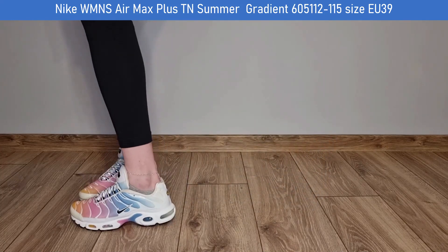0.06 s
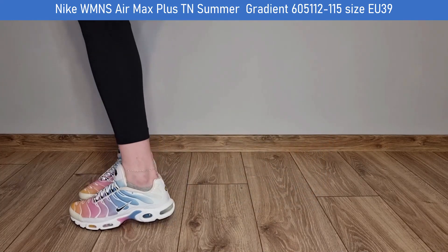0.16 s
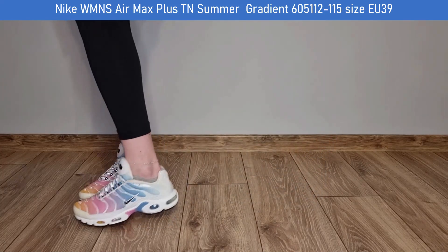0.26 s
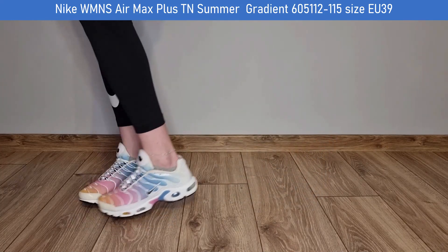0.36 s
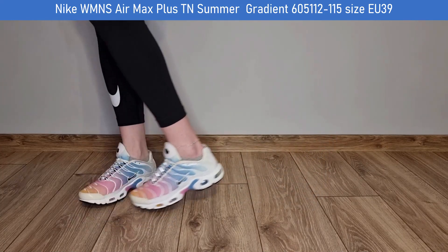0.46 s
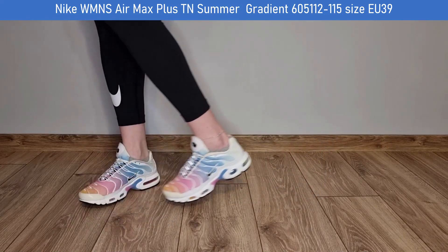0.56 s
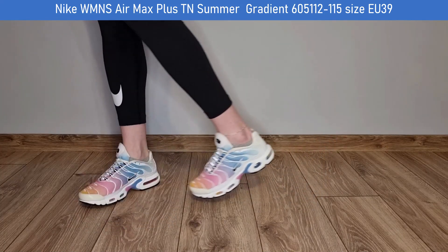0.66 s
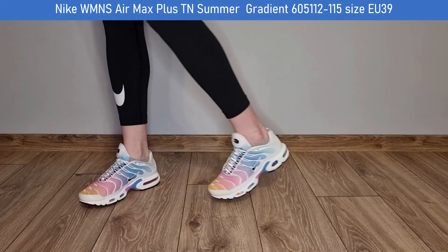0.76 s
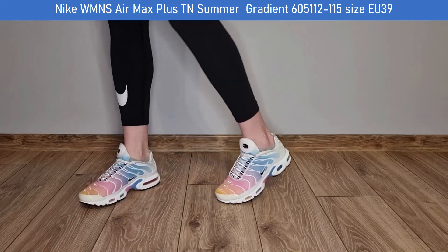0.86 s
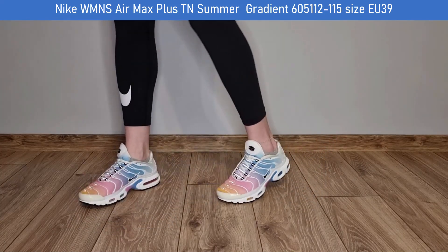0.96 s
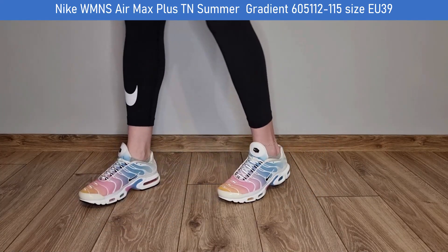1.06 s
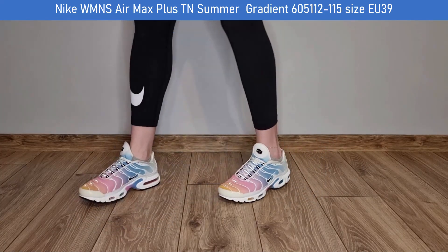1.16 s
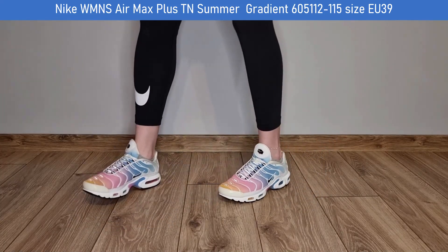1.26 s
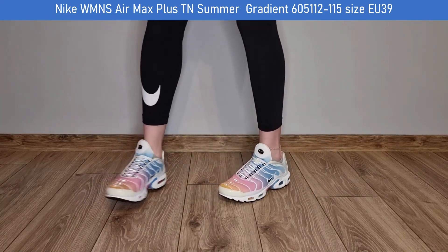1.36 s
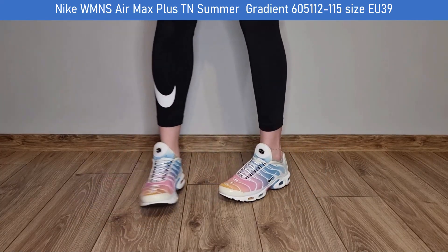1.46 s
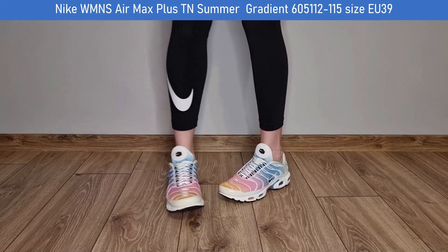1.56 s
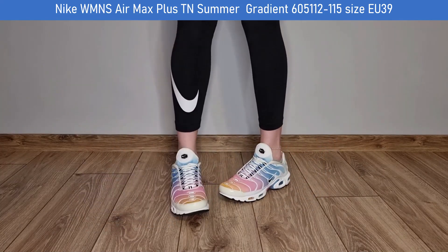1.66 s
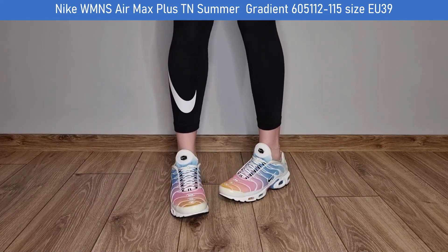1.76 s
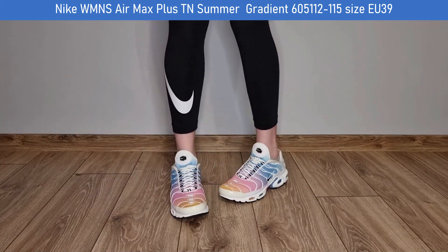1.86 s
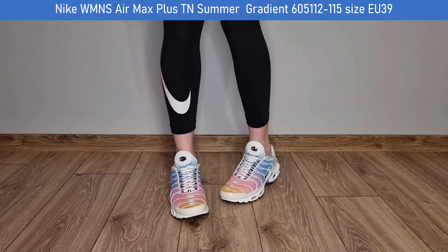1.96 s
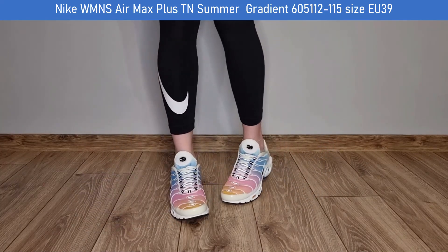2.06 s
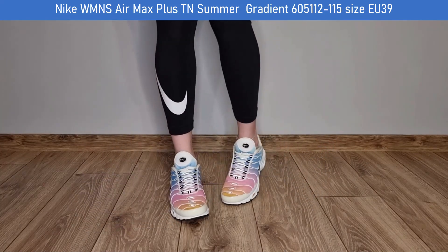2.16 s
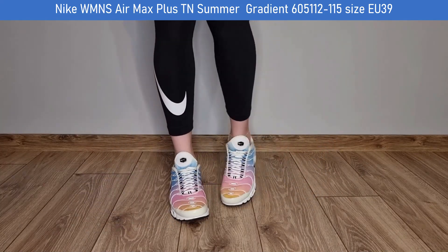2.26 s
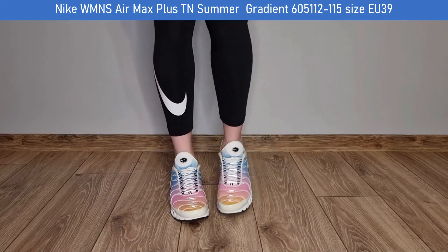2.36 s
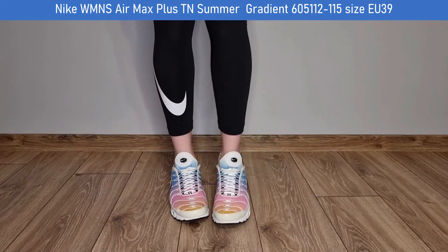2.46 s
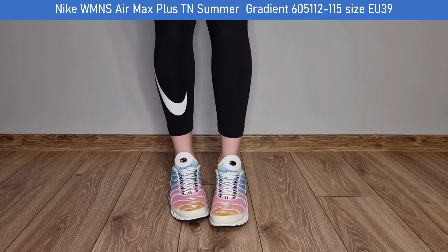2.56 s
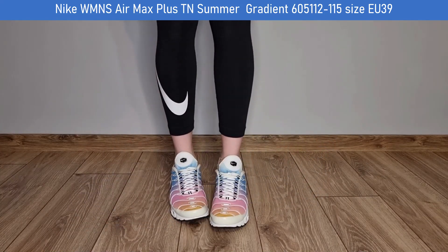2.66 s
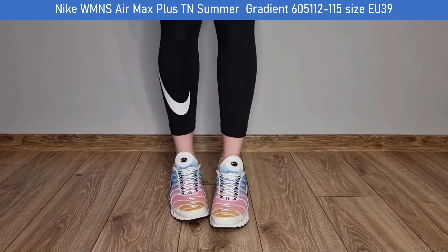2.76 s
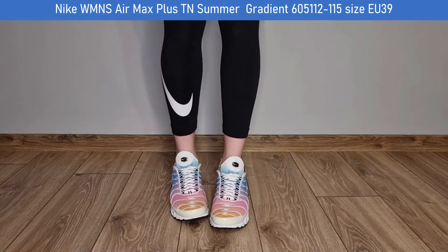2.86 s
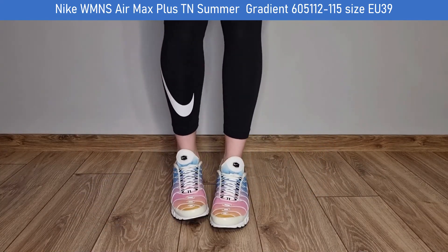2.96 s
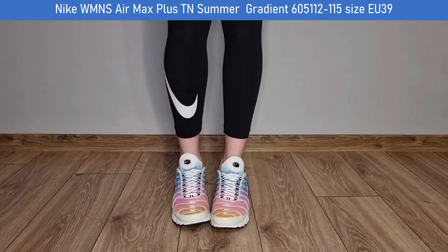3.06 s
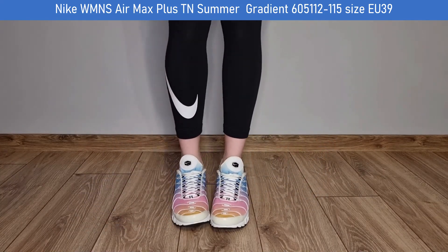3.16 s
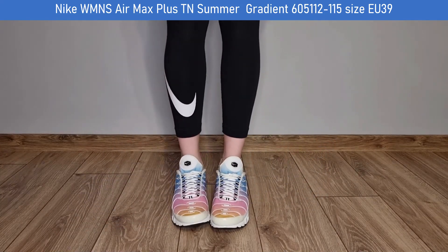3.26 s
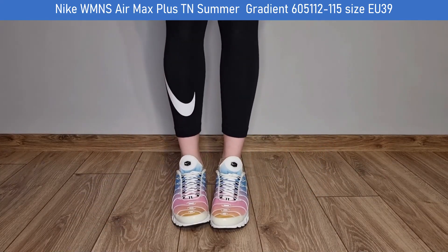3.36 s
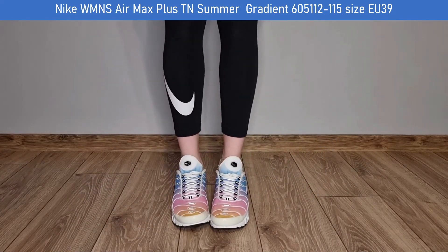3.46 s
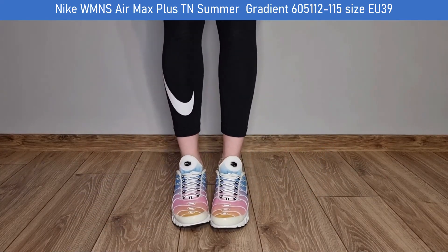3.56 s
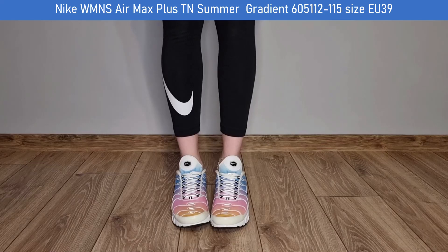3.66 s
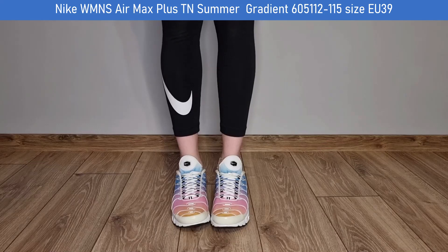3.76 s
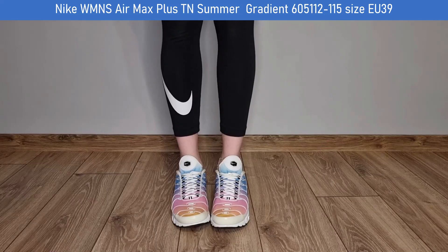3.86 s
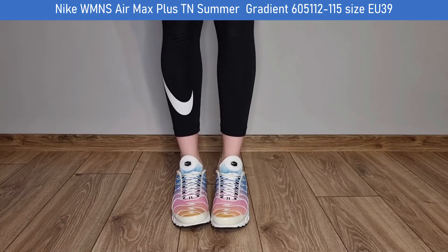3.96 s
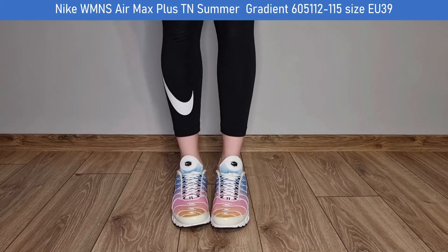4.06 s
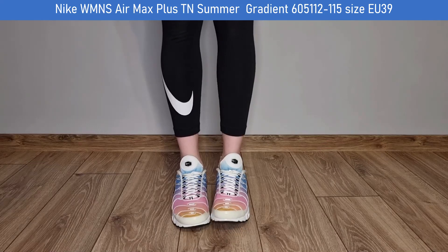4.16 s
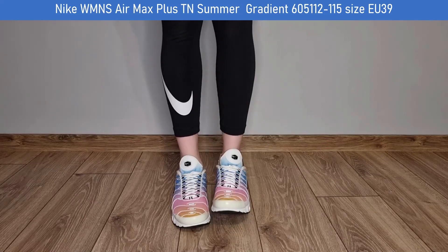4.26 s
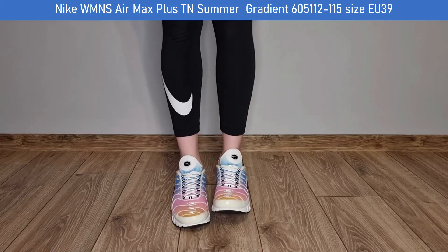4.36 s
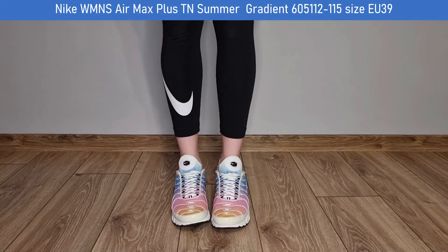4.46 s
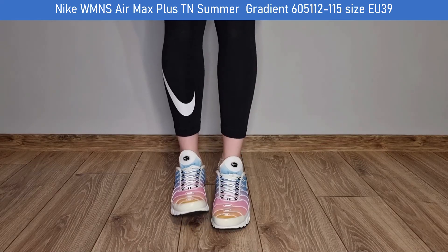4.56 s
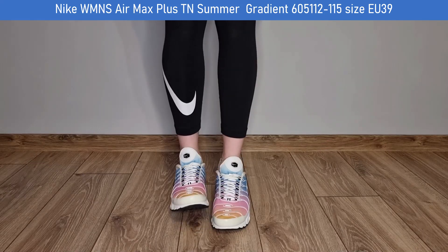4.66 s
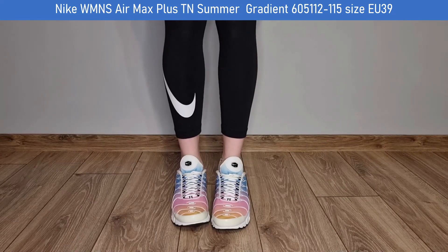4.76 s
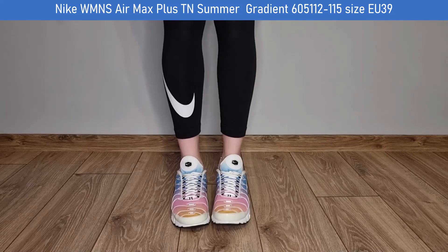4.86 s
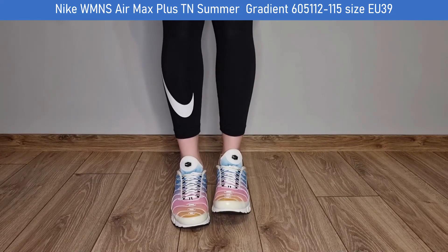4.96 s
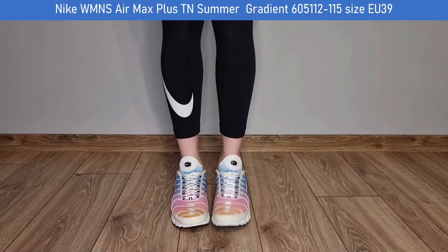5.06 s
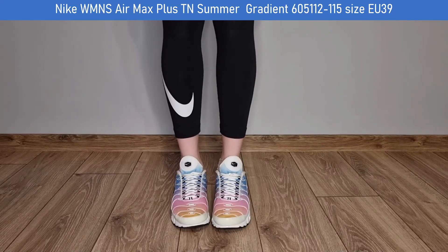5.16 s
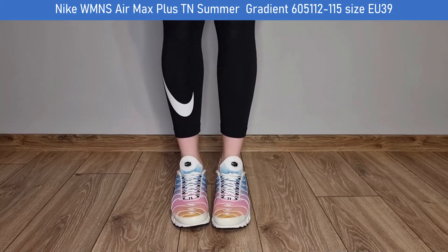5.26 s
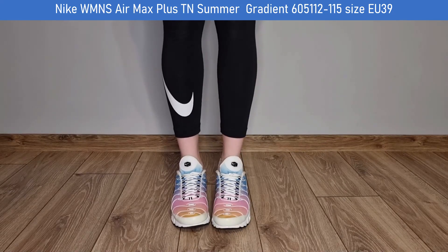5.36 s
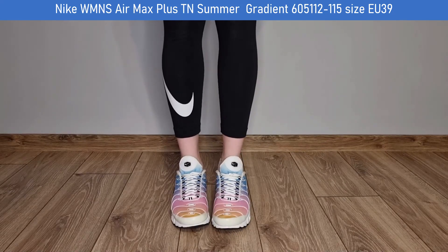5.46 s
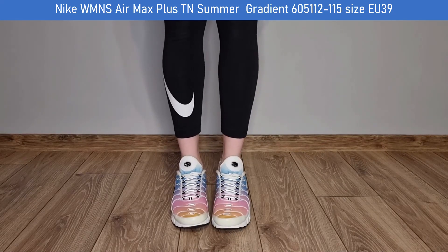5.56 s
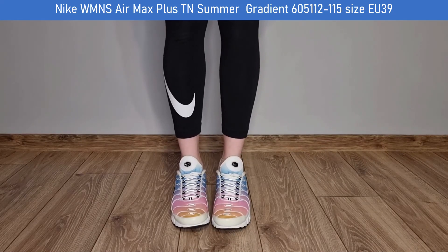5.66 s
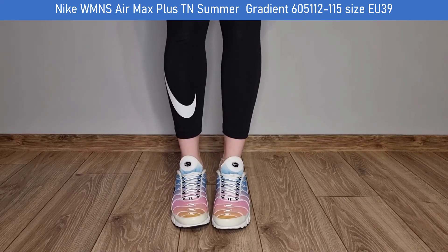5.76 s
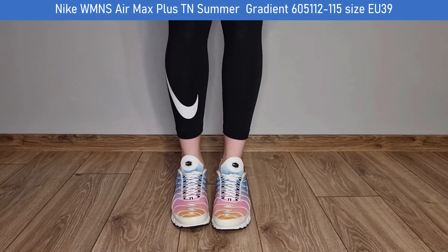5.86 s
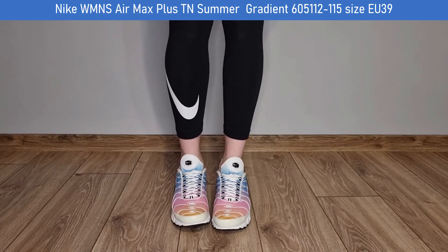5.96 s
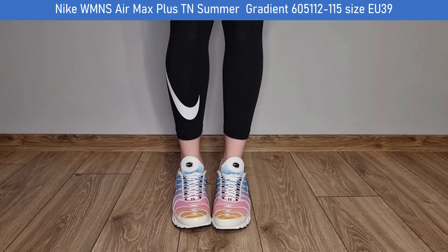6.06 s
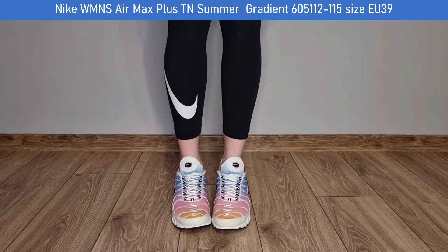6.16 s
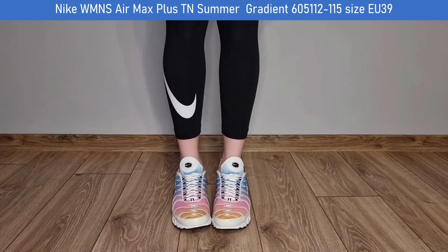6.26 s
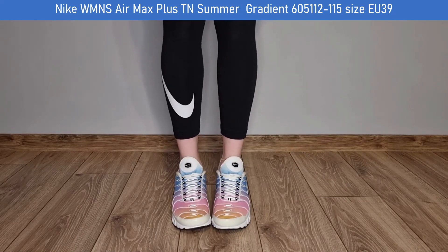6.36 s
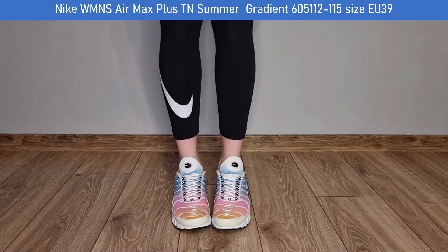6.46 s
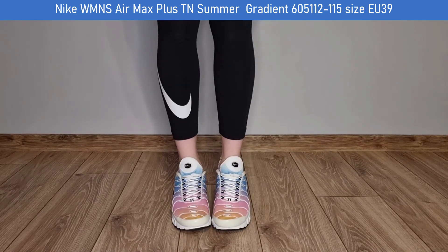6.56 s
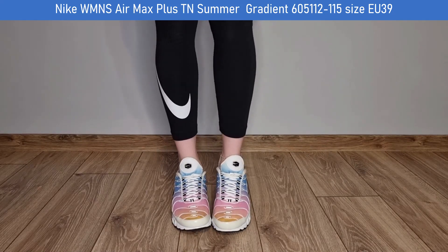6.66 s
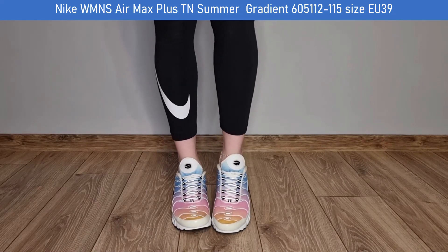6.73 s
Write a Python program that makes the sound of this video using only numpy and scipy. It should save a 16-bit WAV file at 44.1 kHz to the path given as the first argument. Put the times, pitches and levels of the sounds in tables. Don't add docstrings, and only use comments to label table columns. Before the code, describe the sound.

Rubber-soled sneakers scuff, shuffle and tap on a laminate floor in a small bare room, over a faint steady fan hum.

```python
import sys
import numpy as np
from scipy import signal
from scipy.fft import rfft, irfft, next_fast_len
from scipy.io import wavfile
from scipy.ndimage import uniform_filter1d, map_coordinates

SR = 44100
rng = np.random.default_rng(int(sys.argv[2]) if len(sys.argv) > 2 else 0)


def bounce(signal):
    frames = np.transpose(np.atleast_2d(signal))
    limited = np.clip(frames, -1, 1)
    pcm = np.round(limited * 32767).astype(np.int16)
    wavfile.write(sys.argv[1], SR, pcm)


def amplitude_ratio(level_db):
    exponent = np.asarray(level_db, float) / 20
    return 10 ** exponent


N = 299703

# pitch_hz, level_db, left_lag_rad
WHINE = (7982, -86, 2.2)
# frequency_hz, density_db
HISS = [(1500, 6), (3000, 2.5), (4300, -0.5), (6300, 2), (7200, -8), (7600, -3.5), (8300, -23),
        (9000, -12.5), (9600, -5), (10300, -16), (11700, -2.5), (12000, -2), (12300, -21.5), (15500, -14)]
HISS_DB = -86

# frequency_hz, density_db
AIRFLOW = [(15, -12.5), (60, -9), (120, -10), (185, 4), (270, -8), (380, 3.5), (460, -3.5), (560, -1.5),
           (670, -8), (760, -6.5), (900, -12.5), (1200, -11), (1950, -20.5), (2200, -40.5)]
AIRFLOW_DB = -68.5
# shaft_multiple, left_db, right_db
FAN_LINES = [(9, -72, -69.5), (18, -67, -57.5), (24, -87, -90), (28, -94, -98), (35, -91, -92),
             (48, -101.5, -104.5), (52, -102.5, -111.5), (54, -99, -103), (56, -103.5, -97.5),
             (60, -99, -97.5), (68.6, -108, -99), (79.55, -99, -92.5), (82.5, -100, -99), (92.4, -99, -94)]
SHAFT_HZ = 21.497
# frequency_hz, correlation
NOISE_ALIKE = [(25, -0.13), (170, 0.81), (270, 0.2), (380, 0.65), (500, -0.2), (900, -0.65), (1500, -0.62),
               (2000, -0.1), (8000, 0.006)]

# frequency_hz, density_db
CLOTH = [(1500, -23), (2200, 0), (3000, -1.5), (4200, -4), (5000, -3), (6300, 2.5), (7200, -2.5),
         (8000, -16), (10300, -15), (12000, -13.5)]
# start_s, hold_s, level_db
BRUSHES = [(0.0, 0.011, -76), (.145, 0.055, -74), (1.2, 0.23, -82), (1.6, 0.13, -82), (1.94, 0.053, -76),
           (2.05, 0.31, -82), (2.87, 0.022, -80.5), (2.99, 0.52, -87.5), (3.6, 0.24, -90.5),
           (4.0, 0.29, -91), (4.6, 0.051, -77), (4.92, 0.035, -78), (5.05, .13, -95), (6.47, 0.31, -78)]
BRUSH_RISE, BRUSH_FALL = 390, 290
# start_s, hold_s, level_db
FIZZ = [(.125, .01, -88.5), (.29, .015, -89), (.885, .01, -93), (1.2, 0.025, -99), (1.3, 0.018, -88),
        (1.55, .01, -95), (1.66, .01, -100), (1.94, .01, -97), (2.09, .29, -95), (2.64, 0.013, -81),
        (2.87, .02, -105), (2.99, .03, -99), (3.4, .015, -94), (4.25, .015, -99), (4.5, 0.17, -90.5),
        (4.79, 0.099, -99), (5.06, .02, -99), (6.42, .03, -88), (6.48, 0.046, -85), (6.59, 0.046, -87),
        (6.71, .04, -91), (6.78, .02, -90)]
FIZZ_RISE, FIZZ_FALL = 500, 550
# start_s, hold_s, level_db
RUBS = [(1.95, 0.45, -102), (2.8, .26, -94), (6.33, 0.054, -99), (6.49, 0.22, -88.5)]
RUB_RISE, RUB_FALL = 140, 170

# crest_s, peak_db, pitch_hz
PUSHES = [(2, -66, 160), (1.595, -48, 153), (1.658, -50, 167), (1.812, -53, 137), (2.6828, -39, 99),
          (2.371, -65.5, 53), (.8893, -39, 503), (1.5895, -52.5, 500), (1.6555, -53.5, 720),
          (.9075, -31.5, 170), (3.2125, -43, 57)]

# start_s, peak_db, lean_db_per_octave (to higher modes), middle_focus_db
THUDS = [(0.888, -45.5, 6, -4.5), (0.898, -65, 14, -22.5), (0.937, -52.5, 8, 3), (1.236, -47, -9, 22),
         (1.258, -63.5, 11.5, 0.5), (1.31, -89, -5, 0), (1.592, -46.5, 3.5, 16), (1.65, -61, 3, -5),
         (1.81, -66.5, 8.5, -1), (2.368, -80, 11, 3), (2.618, -48, 1.5, 2), (2.673, -82, -3, -9),
         (3.177, -40.5, 3.5, 5), (3.189, -45, 5, -5.5), (3.211, -43, 15.5, 5.5), (3.783, -63, 10, 9),
         (3.819, -61, 6, 15), (4.207, -66, 8, -5), (4.506, -46, -8, 3), (4.518, -31, 5, 2),
         (4.826, -30.5, 6.5, 5), (5.145, -52.5, 17.5, 1), (5.155, -34.5, 5.5, 1), (6.107, -46, 4, -3)]
THUD_HZ = 85
# pitch_hz, level_db, t60_s, buildup_s, polarity
MODES = [(37.7, 6, 0.32, 0.02, 1), (45.3, -0.5, 0.37, 0.025, -1), (55.4, -1, .4, 0.044, -1),
         (64.6, 6.5, 0.32, 0.078, 1), (73.7, -8, 0.28, 0.04, 1), (89.9, 5.5, 0.18, 0.0091, 1),
         (106.7, -1.5, 0.28, 0.022, 1), (120.3, 0.5, 0.35, 0.037, 1), (144.6, -10.5, .26, 0.0051, 1),
         (152.1, 1.5, 0.31, 0.012, 1), (166.6, -5, 0.12, 0.024, 1), (189.7, -9, 0.32, 0.027, 1),
         (226, -24, 0.51, .0038, 1), (131, -4.5, 0.05, 0.0035, 1)]
# start_s, lowest_room_db, deep_room_db, board_db, upper_db
SETTLES = [(.888, -3, 6.5, -2, 1.5), (.937, -8, -6, 0, -2), (1.235, 0, -2, -4, 0), (1.259, 2, 3, -5, -2),
           (1.593, 5, 2.5, -2.5, -9), (1.65, 7, -1, 11, 2.5), (2.617, -1, 4.5, 6.5, 0),
           (3.177, 4, 6.5, -0.5, -6), (3.189, 8, 8, 4, 1), (3.212, 7, 4, 8.5, -8), (3.782, 2, -3, 3, -1.5),
           (4.208, -8, -5.5, 5, -7), (4.506, 1, -5, -8, 5), (4.518, 5, 0.5, -7.5, -3.5),
           (4.827, 0, 8, -11, 2), (5.145, -1, 8.5, -4, -1), (5.156, -1, 8, -1, 0.5),
           (6.105, -1, 14, 4, -5.5)]
# centre_hz, width_octaves
MODE_GROUPS = [(41, 0.2), (68, 0.28), (91.6, 0.18), (150, 0.2)]
# frequency_hz, left_lead_rad
MODE_LEAD = [(41, 0.5), (60, 0.82), (90, 0.07), (150, 0.38)]
# frequency_hz, left_over_right_db
MODE_PAN = [(41, -1.5), (65, -1), (90, -2.2), (150, -0.8)]

# start_s, sole_db, dullness_db_per_octave, board_knock_db, tread_hiss_db
SLAPS = [(0.8868, -33, 5, -1.5, -37), (0.947, -46.5, 10, -19, -50), (1.236, -45, 6.5, -15.5, -65),
         (1.5854, -35, 9, -24, -65), (1.653, -38, 5.5, -13, -47), (1.81, -62, 13, -39, -66),
         (2.6151, -34.5, 9.5, -25, -47), (2.6354, -34.5, 2, -29, -39), (2.677, -65, 16, -36, -57),
         (3.1768, -24, 11.5, -8.5, -36.5), (3.188, -39.5, 9, -35, -61), (3.204, -39, -5, -40, -51),
         (4.505, -28, 3.5, -11.5, -29.5), (4.5176, -14, 5.5, -5.5, -55.5), (4.826, -2.5, 4.5, 2.5, -28),
         (5.1426, -36, 1.5, -9, -28.5), (5.1551, -20, 11.5, -5, -40), (6.104, -18.5, 10, -13, -41)]
# start_s, sole_db, dullness_db_per_octave, tread_hiss_db
SCUFFS = [(0.136, -45.5, 18, -38.5), (0.153, -44, 10, -39), (0.169, -41.5, 1, -66),
          (0.323, -54.5, 20.5, -58), (1.1544, -49, 4, -41), (1.166, -41.5, 9.5, -47.5),
          (1.1845, -37, 7, -49), (1.2978, -38.5, 8.5, -40.5), (2.919, -59, 9.5, -52),
          (4.201, -42, 9.5, -42.5), (5.528, -56, 14.5, -69), (1.672, -40, 8.5, -52), (1.69, -48, 9, -54),
          (4.972, -41.5, 1, -47), (6.4958, -46.5, 17, -43.5)]
SCUFF_KNOCK_DB = 2
# start_s, sole_db
GRAZES = [(4.492, -39), (4.4993, -33), (4.502, -28.5), (5.129, -39), (5.137, -31), (5.1408, -40.5),
          (5.1576, -16), (4.806, -38), (4.813, -47), (4.82, -37), (6.091, -43), (6.098, -43), (2.606, -50),
          (3.158, -50), (3.163, -52), (2.6335, -35.5), (2.647, -44), (3.17, -45)]
GRAZE_DULL, GRAZE_HISS_DB = 6.8, -33
# frequency_hz, gain_db
SOLE = [(130, -22), (250, 3.5), (340, 3.5), (600, -2.5), (760, 4.5), (1250, 1), (1500, 0.5), (2200, 0.5),
        (3000, -2.5), (4250, 0), (4600, -4.5), (6300, -0.5), (7200, -8.5), (7700, -30)]
# start_s, lift_db
CUPS = [(.137, 25.5), (.153, 17), (2.6151, 12.5), (3.1768, 10), (3.188, 16), (3.204, 6), (4.5057, 7),
        (4.826, -8.5), (5.1426, 20), (6.4958, -12)]
CUP_HZ, CUP_OCTAVES = 1870, 0.57
# start_s, pitch_hz, lift_db
POCKETS = [(.887, 3340, 12.5), (.887, 3900, 10), (.887, 1700, 5.5), (.887, 566, 12.5), (.887, 286, 4.5),
           (.887, 353, 4), (.887, 1030, 12), (2.6155, 505, 18), (3.158, 3020, 17), (3.164, 2960, 10),
           (6.092, 3020, 20), (6.098, 3600, 5), (3.17, 3000, 24), (1.672, 6100, 15), (4.972, 6270, 2.5),
           (.947, 310, 2), (.947, 530, 8), (.947, 410, -1), (1.155, 6800, 7), (4.826, 250, -8),
           (4.826, 315, 3.5), (5.155, 6000, 3.5), (4.826, 3260, 4), (1.166, 6370, 9.5), (1.585, 6300, 8),
           (1.69, 6100, 8), (1.185, 4300, 14.5), (1.298, 5460, 8.5), (1.298, 2700, 6), (1.298, 3070, 16),
           (2.6155, 4340, 12), (2.635, 4380, 12), (2.635, 4850, 1), (2.647, 3100, 9), (2.647, 4400, 9),
           (2.635, 6400, 5.5), (2.635, 3140, 8), (3.177, 2970, 16), (3.177, 3850, 10.5), (3.177, 860, 6),
           (3.177, 1680, 6.5), (3.177, 2300, 4.5), (3.204, 860, 9), (4.5175, 5930, 16),
           (4.5175, 1145, 14.5), (4.5175, 745, 5), (4.5175, 348, 7.5), (4.5175, 1770, 5.5),
           (5.155, 2300, 0), (4.826, 1300, 5.5), (4.826, 1160, 3.5), (4.826, 2100, -4.5), (4.826, 850, -2),
           (4.826, 750, -1), (3.177, 4770, -7), (3.177, 6200, 1), (1.298, 4200, 15), (1.298, 1190, 10),
           (1.185, 1200, 7), (5.155, 347, 4), (5.155, 650, -5), (.887, 420, -2), (.887, 700, 5),
           (.887, 2700, 2.5), (4.826, 2870, 4), (5.155, 1204, 8.5), (6.104, 2630, 10.5), (6.104, 3280, 13),
           (6.104, 1770, 10.5)]
POCKET_WIDTH = 0.11

# frequency_hz, gain_db
DIRECT = [(400, -2), (1200, -6.5), (3000, 5), (6000, 0)]
# frequency_hz, left_over_right_db
CRACK_PAN = [(400, -1.5), (1200, 0.5), (3000, -4.5), (5000, -3)]
CRACK_LEAD_S = 0.00004
# delay_s, level_db
NEAR = [(.0027, -4), (.0046, -34.5), (.009, -20.5)]
# frequency_hz, gain_db
NEAR_DULL = [(600, 0.5), (2500, -6.5), (6000, -2.5)]
# frequency_hz, t60_s
WALLS = [(250, 0.43), (1000, 0.38), (3000, 0.32), (7000, 0.26)]
# frequency_hz, gain_db
ROOM_SHARE = [(300, 4.5), (1000, 2), (3000, 5.5), (6000, 3.5)]
# frequency_hz, left_over_right_db
TAIL_PAN = [(400, -2), (1300, 0.5), (3000, 0.5), (5000, 0.5)]
# frequency_hz, correlation
TAIL_ALIKE = [(170, 0.98), (280, 0.39), (450, .15), (700, -0.078), (1150, -0.41), (2000, -0.14),
              (3500, -0.078), (7000, -0.096)]
# pitch_hz, lift_db
RINGS = [(500, 7.5), (722, 6.5), (757, 3), (829, 3.5), (900, 2.5), (991, 5), (1077, 3), (1140, 3),
         (1235, 4.5), (1345, 4), (1464, 3), (1720, 2.5), (1865, 4), (2690, 0), (2980, 2)]
RING_WIDTH_HZ = 9.6
# start_s, direct_over_room_db, left_over_right_db,
# tail_length_share, pocket_lift_lost_share
FACING = [(.137, 0, 4, 0.89, .01), (.323, 3.5, 0, 0.84, .01), (.887, -2.5, 3, 0.82, .01),
          (.947, 7, 0, 0.63, .1), (1.1553, 5, 2, .7, .3), (1.166, 7.5, -1, .7, .3),
          (1.185, -2, 0, .95, .01), (1.298, -1, 2, .99, .1), (1.5854, -6, 0, .8, .01),
          (1.653, -4.5, 3, 0.87, .1), (2.6151, 1.5, 0, .9, .4), (2.6354, 4, -1, 0.9, .4),
          (2.919, 3, 0, .8, .01), (3.1768, -1, -1, .99, .2), (4.505, 2, 0.5, .9, .01),
          (4.5176, -1.5, -3, 1, .3), (4.826, 2.5, -2, 1, .1), (4.972, 6.5, 4, .8, .3),
          (5.1426, 1, -1, 0.85, .01), (5.1551, 1.5, -1, 0.85, .2), (5.528, 8, 0, .8, .01),
          (6.104, 2, -1, 0.95, .3)]


def unit(x):
    return x / np.sqrt(np.mean(x ** 2) + 1e-20)


def along(points, hz):
    f, v = np.transpose(points)
    return np.interp(np.log(hz + 1), np.log(f + 1), v)


def wobble(rate):
    steps = np.arange(0, N + 32, 32)
    knots = rng.standard_normal(int(N * rate / SR) + 4)
    return np.interp(np.arange(N), steps, map_coordinates(knots, [steps * rate / SR]))


def pair(two, hz, alike):
    turn = np.arccos(np.clip(along(alike, hz), -1, 1)) / 2
    mid = two[0] * np.cos(turn)
    side = two[1] * np.sin(turn)
    return np.array([mid + side, mid - side])


def rush(spectrum):
    m = next_fast_len(N)
    hz = np.fft.rfftfreq(m, 1 / SR)
    white = rfft(rng.standard_normal((2, m)))
    coloured = pair(white, hz, NOISE_ALIKE) * amplitude_ratio(along(spectrum, hz))
    return unit(irfft(coloured, m)[:, :N])


def causal(db):
    cepstrum = irfft(np.log(amplitude_ratio(db)))
    half = len(cepstrum) // 2
    fold = np.r_[1, 2 * np.ones(half - 1), 1, np.zeros(half - 1)]
    return np.exp(rfft(cepstrum * fold))


def strokes(rows, rise, fall):
    t = np.arange(0, N + 32, 32) / SR
    gain = 0
    for start, hold, db in rows:
        early = np.maximum(start - t, 0)
        late = np.maximum(t - start - hold, 0)
        gain = gain + amplitude_ratio(db - rise * early - fall * late)
    return np.interp(np.arange(N) / SR, t, gain)


def whine():
    hz, db, lag = WHINE
    turn = 2 * np.pi * hz * np.arange(N) / SR
    level = np.sqrt(2) * amplitude_ratio(db + 0.31 * wobble(3.3))
    tone = level * np.sin([turn - lag / 2, turn + lag / 2])
    return tone + amplitude_ratio(HISS_DB) * rush(HISS)


def fan():
    shaft = 2 * np.pi * np.cumsum(SHAFT_HZ * (1 + 0.00117 * wobble(3))) / SR
    out = amplitude_ratio(AIRFLOW_DB + 1.2 * wobble(19.0)) * rush(AIRFLOW) * amplitude_ratio([[-0.8], [0.8]])
    for order, left_db, right_db in FAN_LINES:
        sway = 0.93 * wobble(11) + 0.66 * wobble(1.4)
        sway = sway + 0.16 * np.array([wobble(23.0), wobble(8.5)])
        level = np.sqrt(2) * amplitude_ratio(np.array([[left_db], [right_db]]) + sway)
        start = rng.uniform(0, 2 * np.pi) + np.array([[-0.12], [0.12]])
        out += level * np.sin(round(order) * shaft + start)
    return out


def rustle():
    brush = strokes(BRUSHES, BRUSH_RISE, BRUSH_FALL) * amplitude_ratio(-5.0 + 2.0 * wobble(30)) * rush(CLOTH)
    crackle = rush([(11500, -47.5), (12300, 4.0), (15600, 6.5), (15800, -52.0)])
    level = amplitude_ratio(-110) + strokes(FIZZ, FIZZ_RISE, FIZZ_FALL)
    return brush + level * amplitude_ratio(4 * wobble(28)) * crackle


def rub():
    padding = rush([(900, -33), (1300, 1), (2300, -22), (3100, 4.0), (4200, 4.5), (4800, -20)])
    return strokes(RUBS, RUB_RISE, RUB_FALL) * amplitude_ratio(-3 + 2.2 * wobble(22)) * padding


def pushes():
    t = np.arange(N) / SR
    out = np.zeros(N)
    for crest, db, hz in PUSHES:
        cycles = hz * (t - crest)
        out += amplitude_ratio(db - 770 * (cycles / 9) ** 2) * np.cos(2 * np.pi * cycles - 0.6)
    return out


def thuds():
    out = np.zeros((2, N + SR))
    t = np.arange(SR // 2) / SR
    hz, mode_db, t60, rise, polarity = np.transpose(MODES)[:, :, None]
    octave = np.clip(np.log2(hz / THUD_HZ), -1.1, 0.9)
    groups = [np.exp(-(np.log2(hz / centre) / width) ** 2) for centre, width in MODE_GROUPS]
    luck = rng.standard_normal((len(THUDS), 3, len(MODES), 1))
    for (s, db, lean, focus), (size, phase, slant) in zip(THUDS, luck):
        settle = 0
        for at, *lifts in SETTLES:
            if abs(at - s) < 1 / 250:
                settle = settle + sum(lift * group for lift, group in zip(lifts, groups))
        mode_level = db + settle + lean * octave - focus * octave ** 2 + mode_db + 1.8 * size
        decay = amplitude_ratio(mode_level - 60 * t / t60)
        swing = np.sign(polarity) * decay * (1 - np.exp(-t / rise))
        turn = 2 * np.pi * hz * (t - 0.0062) + phase / 5
        lead = along(MODE_LEAD, hz) / 2 + 0.043 * slant
        pan = along(MODE_PAN, hz) / 2
        ports = [(swing * amplitude_ratio(way * pan) * np.cos(turn + way * lead)).sum(axis=0) for way in (1, -1)]
        out[:, round(s * SR):][:, :len(t)] += ports
    return out[:, :N]


def walls(size, length):
    hz, t, z = signal.stft(rng.standard_normal((2, size)), SR, nperseg=256)
    decay = amplitude_ratio(-60 * t / (length * along(WALLS, hz))[:, None])
    spectra = pair(z, hz[:, None], TAIL_ALIKE) * decay
    tail = signal.istft(spectra, SR, nperseg=256)[1][:, :size]
    tail = tail * (1 - np.exp(-np.arange(size) / (0.0064 * SR)))
    return tail / np.linalg.norm(tail[0])


def contacts():
    light = [(s, db, dull, db + dull + SCUFF_KNOCK_DB, hiss) for s, db, dull, hiss in SCUFFS]
    first = [(s, db, GRAZE_DULL, db + GRAZE_DULL, db + GRAZE_HISS_DB) for s, db in GRAZES]
    return sorted(SLAPS + light) + first


def slaps():
    size, before = 16384, 2048
    out = np.zeros((2, N + 3 * size))
    t = (np.arange(size) - before) / SR - 0.0006
    f = np.fft.rfftfreq(2 * size, 1 / SR)
    ports = np.array([[0.5], [-0.5]])

    reflections = sum(amplitude_ratio(db) * np.exp(-2j * np.pi * f * late) for late, db in NEAR)
    echoes = causal(along(DIRECT, f)) + causal(along(NEAR_DULL, f)) * reflections
    echoes = echoes * amplitude_ratio(ports * along(CRACK_PAN, f)) * np.exp(2j * ports * np.pi * f * CRACK_LEAD_S)
    rings = causal(sum(lift * np.exp(-((f - hz) / RING_WIDTH_HZ) ** 2) for hz, lift in RINGS))
    room = rings * amplitude_ratio(along(ROOM_SHARE, f) + ports * along(TAIL_PAN, f))

    knots = np.geomspace(200, 9000, num=26)
    for s, sole, dull, knock, hiss in contacts():
        cup = sum(lift for at, lift in CUPS if abs(at - s) < 1 / 500)
        colour = along([(400, knock), (950, sole + dull), (3000, sole - 0.93 * dull),
                        (4000, sole - 1.0 * dull - 2), (5000, hiss), (6500, hiss)], f)
        colour = colour + cup * np.exp(-(np.log2((f + 1) / CUP_HZ) / CUP_OCTAVES) ** 2)
        patches = along(np.c_[knots, 1.2 * rng.standard_normal(len(knots))], f)
        pockets = sum(lift * np.exp(-((f - hz) / (POCKET_WIDTH * hz)) ** 2)
                      for at, hz, lift in POCKETS if abs(at - s) < 1 / 200)

        crack_s = 0.0012 + 0.046 / (1 + amplitude_ratio(2 * (sole + cup + 35)))
        closing = amplitude_ratio(-31 + 60 * np.minimum(t, 0) / 0.037)
        crack = amplitude_ratio(-60 * np.maximum(t, 0) / crack_s)
        puff = rfft(rng.standard_normal(size) * np.where(t < 0, closing, crack), 2 * size)
        even = -10 * np.log10(uniform_filter1d(np.abs(puff) ** 2, size=400))

        facing = (row[1:] for row in FACING if abs(row[0] - s) < 1 / 600)
        direct_db, pan, length, lost = next(facing, (0, 0, 1, 0))
        tail = room * amplitude_ratio(-lost * pockets) * rfft(walls(size, length), 2 * size)
        path = tail + echoes * amplitude_ratio(direct_db + ports * pan)
        body = causal(along(SOLE, f) + colour + patches + pockets + even)
        out[:, round(s * SR):][:, :2 * size] += amplitude_ratio(-4.0) * irfft(path * puff * body)
    return out[:, before:before + N]


def scene():
    return whine() + fan() + rustle() + rub() + pushes() + thuds() + slaps()


def band_limit(x):
    return signal.sosfilt(signal.butter(12, 15730, fs=SR, output="sos"), x)


def record(dry):
    high_pass = signal.butter(2, 24 / (SR / 2), "high", output="sos")
    thin = signal.sosfilt(high_pass, dry)
    return band_limit(thin)


dry = scene()
out = record(dry)
bounce(out)
```